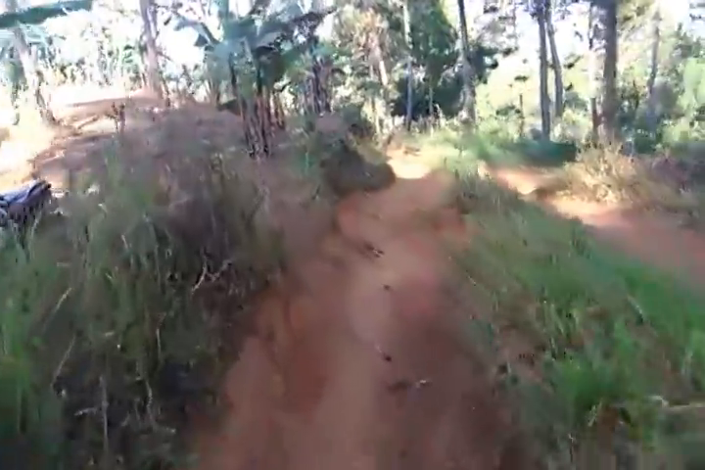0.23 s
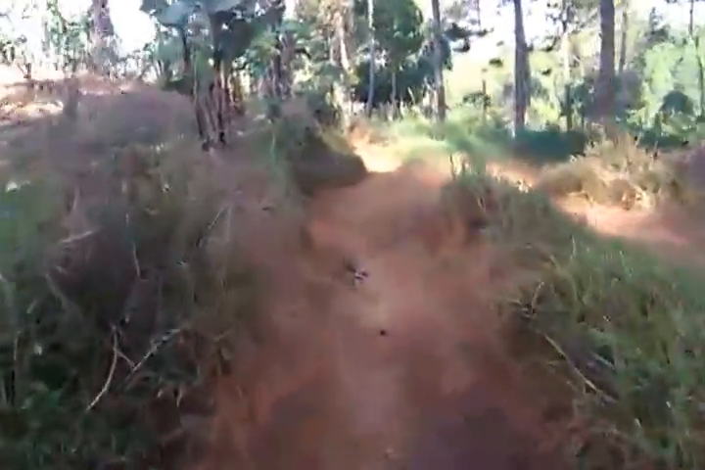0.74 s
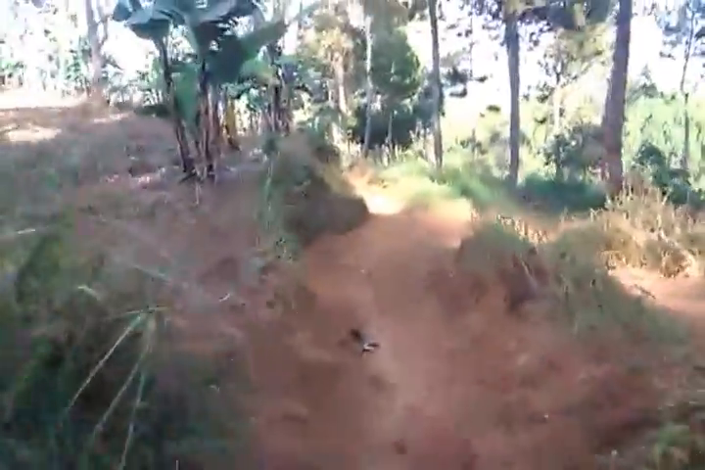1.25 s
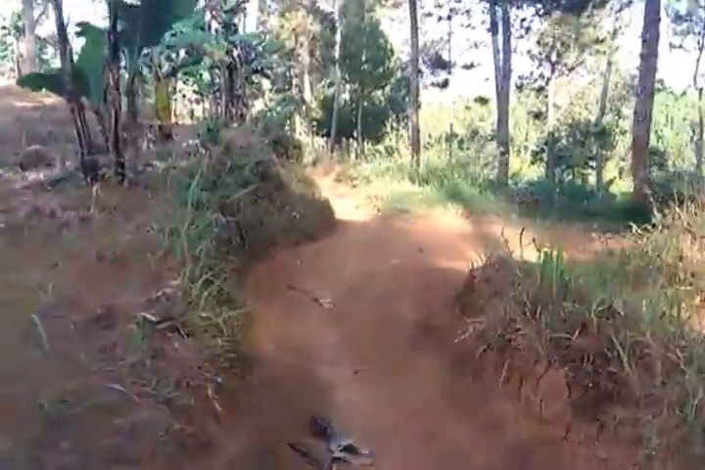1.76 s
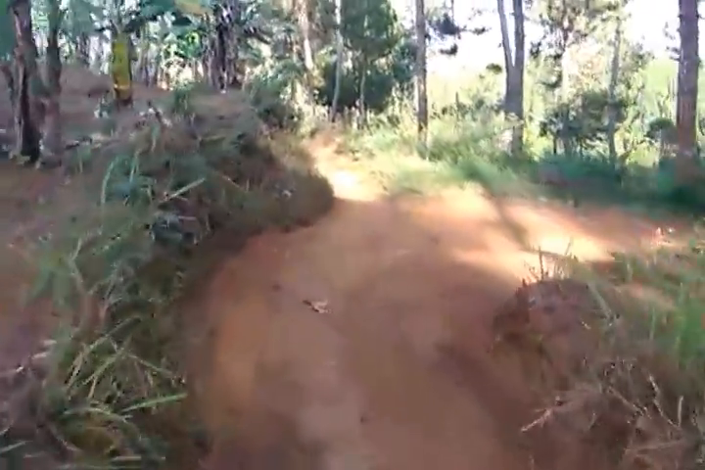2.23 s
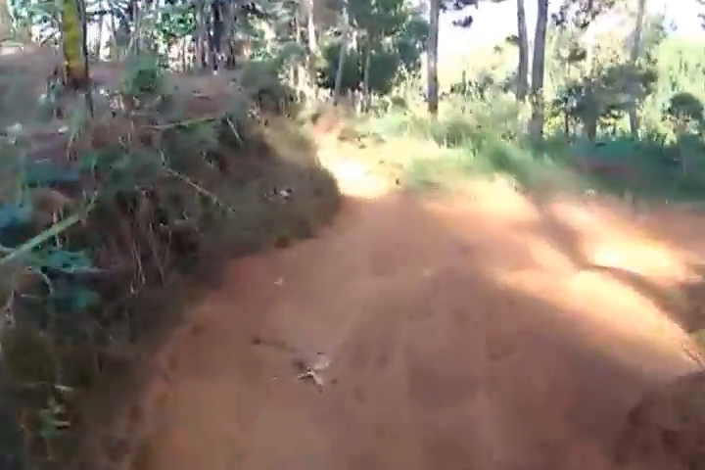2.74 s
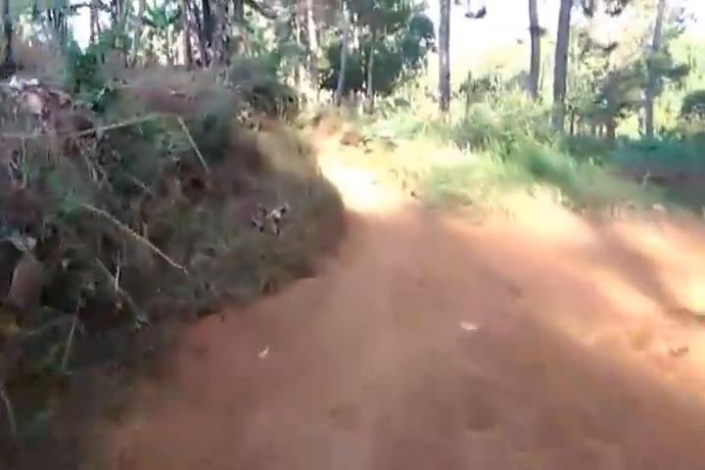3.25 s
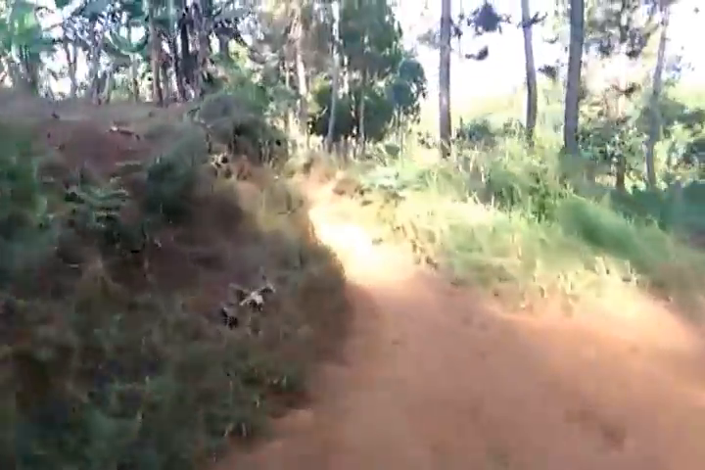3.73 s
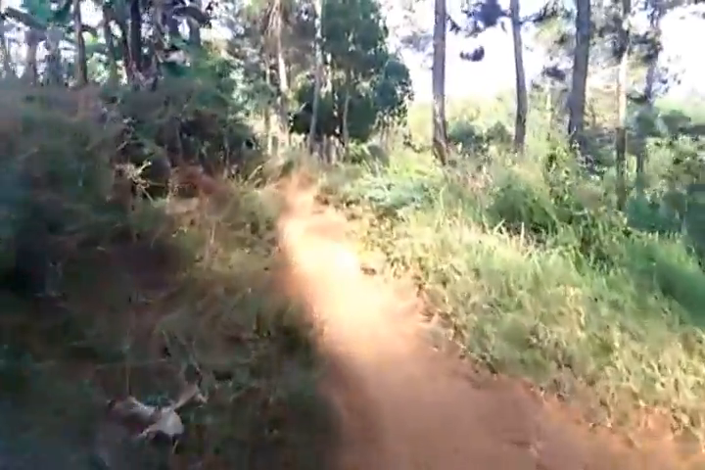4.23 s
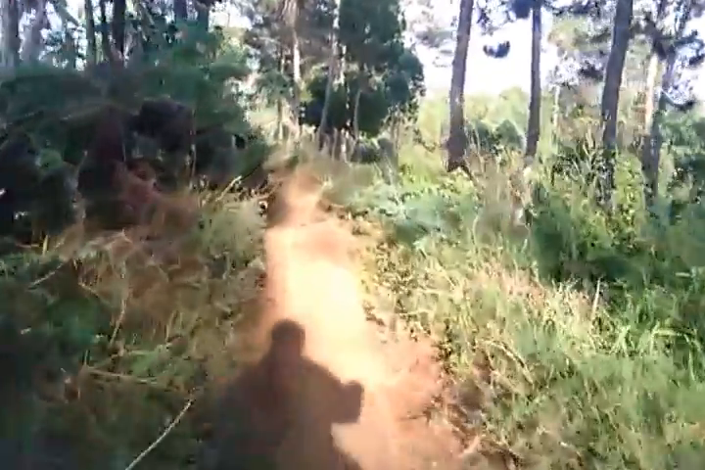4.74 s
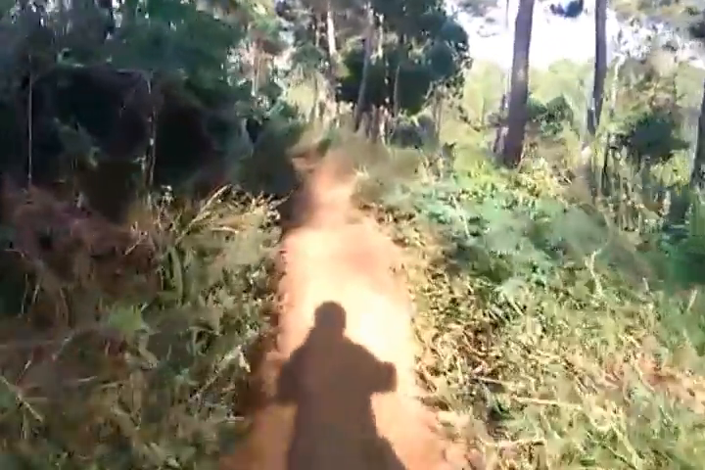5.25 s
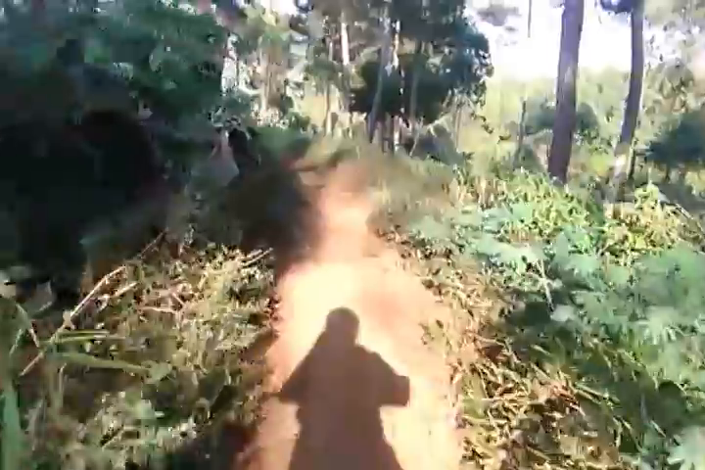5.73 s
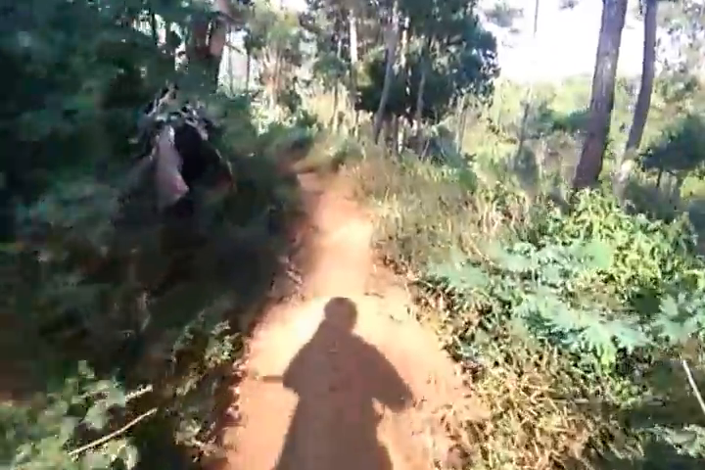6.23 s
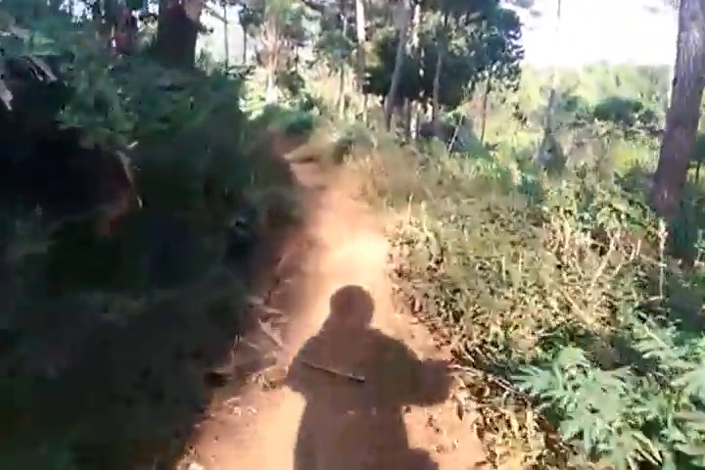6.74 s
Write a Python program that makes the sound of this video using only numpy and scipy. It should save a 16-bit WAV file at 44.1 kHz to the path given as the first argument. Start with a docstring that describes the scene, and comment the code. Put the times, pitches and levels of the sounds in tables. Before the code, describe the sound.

A single-cylinder four-stroke dirt bike putters near idle from the start, heard close from the rider's place in the open air. Each firing gives a low thump and a hollow bark, with valve clatter and faint gear chirps on top. Tyres hiss on the dirt over a low rumble throughout. Dull thuds from bumps cluster around 0.2 and 0.7 seconds, and loose parts give short, scattered rattles, notably near 2 and 2.6 seconds. From about 2.4 seconds the engine picks up, peaking mildly around 3.3 seconds. It then stumbles, with weak firings and a cluster of knocks near 3.8 seconds, and is back at idle by 4 seconds. The putter turns softer from about 4.5 seconds and carries on until about 7 seconds, with a few more thuds and rattles around 4.7, 5.5 and 5.9 seconds.

```python
"""A dirt bike putters down a rough trail, heard from the rider's place. Its single-cylinder
four-stroke engine sucks in air once per firing, thumping the airbox and barking in the intake pipe;
the throttle opens briefly, then the engine stumbles back to idle. Gears chirp and valves clatter in
the casing, tyres hiss on the dirt and loose parts rattle. Dull low thuds come from trail jolts and
uneven engine firings."""
import sys
import numpy as np
from scipy import signal
from scipy.fft import rfft, irfft, next_fast_len
from scipy.io import wavfile
from scipy.ndimage import uniform_filter1d

SR = 44100
rng = np.random.default_rng(int(sys.argv[2]) if len(sys.argv) > 2 else 0)


def output_pcm(signal):
    """Save a mono or channel-first signal as 16-bit PCM at the path in sys.argv[1].

    Samples are clipped to [-1, 1] before scaling.
    """
    pcm = np.clip(np.atleast_2d(signal).T, -1, 1) * 32767
    wavfile.write(sys.argv[1], SR, np.round(pcm).astype(np.int16))


N = 307799
TIME = np.arange(N) / SR

# Dull low thuds, from trail jolts and uneven engine firings.
# Each row: start in seconds, level in dB, pitch in Hz.
LOW_THUDS = [(0.152, -7, 362), (0.2227, -12, 139), (0.2578, -8.5, 223), (0.6513, -9, 184),
             (0.6712, -11, 171), (0.6776, -8, 235), (0.6972, -7, 142), (2.633, -12, 125),
             (3.8117, -10, 170), (3.8236, -4, 380), (3.8555, -9.5, 157), (4.653, -15, 169),
             (4.695, -13, 161), (5.5367, -11.5, 140), (5.9102, -11, 218)]
# The ground under the tyres. Each row: time in seconds, hiss level in dB, rumble level in dB.
GROUND_LEVELS = [(0, -38.5, -29), (1.1, -39.5, -27), (2, -35.5, -30), (2.35, -39.5, -28),
                 (2.7, -35.5, -24.5), (3.35, -34, -24.5), (3.9, -35.5, -24), (4.3, -37.5, -27),
                 (4.9, -40, -28.5), (6.1, -38, -28), (6.98, -38, -29)]


def undb(db):
    """Decibels to gain."""
    return 10 ** (np.asarray(db) / 20)


def unit(x):
    """Scale to rms 1."""
    return x / np.std(x)


def curve(table, column=1):
    """One column of a table, joined by straight lines in time."""
    table = np.array(table)
    return np.interp(TIME, table[:, 0], table[:, column])


def resonance(f, hz, width):
    """Response of a damped resonator at the frequencies f, gain 1 at its centre."""
    return 1j * f * width / (hz ** 2 - f ** 2 + 1j * f * width)


def shape(x, response):
    """Filter a sound with a response given as a function of frequency."""
    size = next_fast_len(len(x) + SR // 10)
    return irfft(rfft(x, size) * response(np.fft.rfftfreq(size, 1 / SR)), size)[:len(x)]


def colour(x, points):
    """Equalise a sound along (Hz, dB) points, at rms 1."""
    hz, db = np.transpose(points)
    return unit(shape(x, lambda f: undb(np.interp(np.log(f + 1), np.log(hz), db))))


def walk(rate):
    """Smooth random wander with a spread near 1, taking `rate` steps a second."""
    hold = int(SR / rate)
    steps = np.repeat(rng.standard_normal(N // hold + 1), hold)
    return unit(uniform_filter1d(steps, hold))[:N]


def grains(rate, spread_db):
    """Random tiny impacts of uneven size, about `rate` a second."""
    hit = rng.random(N) < rate / SR
    return unit(hit * rng.standard_normal(N) * undb(spread_db * rng.standard_normal(N)))


def add(out, sound, start_s):
    """Mix a sound in from the given time on."""
    i = int(round(start_s * SR))
    part = sound[max(-i, 0):max(N - i, 0)]
    out[max(i, 0):max(i, 0) + len(part)] += part


def ground_rumble(flutter_db=2.42, jolt_db=4, jolt_s=0.025):
    """The rough ground shakes the bike; the rumble swells around each thud."""
    # The rumble's tone. Each row: frequency in Hz, relative level in dB.
    rumble_eq = [(10, -2.5), (30, 0.5), (80, 3.5), (150, -1.5), (220, -5.5), (340, -5), (480, -13),
                 (650, -21.5), (1200, -51.5)]
    jolt = np.max([np.exp(-((TIME - s) / jolt_s) ** 2) for s, _, _ in LOW_THUDS], axis=0)
    bed = colour(rng.standard_normal(N), rumble_eq)
    return bed * undb(curve(GROUND_LEVELS, column=2) + jolt_db * jolt + flutter_db * walk(rate=25))


def grit_hiss(valves, valve_depth=0.26, flicker_db=1.11):
    """Fine grit under the tyres and engine hiss, one texture that pulses with the valves."""
    # The hiss's tone. Each row: frequency in Hz, relative level in dB.
    hiss_eq = [(300, -5.5), (600, 6), (1200, 5), (2200, -2), (3100, 1), (3600, -4), (4300, -1.5), (5000, 1),
               (6000, 0.5), (6600, -3), (7200, -4.5), (7800, -16)]
    grit = colour(grains(rate=9000, spread_db=0) * (1 + valve_depth * valves), hiss_eq)
    return grit * undb(curve(GROUND_LEVELS) + flicker_db * walk(rate=45))


def rattles(attack_s=.0012):
    """Loose parts and stones give short bursts of ringing noise, and a sharp broad click sounds at 3.025 s."""
    # Each row: start in seconds, level in dB, centre in Hz, width in Hz, decay in seconds.
    rattle_hits = [(.153, -20, 485, 200, 0.0049), (.443, -36.5, 2580, 500, .014),
                   (.668, -26, 406, 200, 0.039), (1.511, -22, 558, 400, 0.0071),
                   (1.877, -27, 5200, 3060, 0.0046), (2.018, -20, 4020, 2400, 0.003),
                   (2.542, -26.5, 5370, 1200, 0.0097), (2.556, -22, 690, 453, 0.021),
                   (2.558, -23, 1910, 993, 0.014), (2.703, -26.5, 740, 400, 0.02),
                   (3.025, -25, 4000, 4000, 0.0029), (3.823, -25.5, 706, 497, 0.017),
                   (3.826, -26, 1930, 300, 0.026), (3.910, -33, 5380, 3000, 0.029),
                   (4.057, -23.5, 1600, 1200, 0.01), (4.695, -25, 1944, 119, 0.016),
                   (4.974, -31, 1890, 200, 0.019), (5.770, -24.5, 705, 248, 0.011),
                   (6.574, -32.5, 5630, 2500, 0.018), (6.598, -28.5, 1120, 288, 0.012)]
    out, t = np.zeros(N), TIME[:SR // 6]
    for start, db, hz, width, decay in rattle_hits:
        burst = unit(shape(rng.standard_normal(len(t)), lambda f: resonance(f, hz, width) ** 2))
        envelope = np.exp(-t / decay) * (1 - np.exp(-t / attack_s))
        add(out, undb(db) * burst * envelope, start)
    return out


def low_thuds(rise_cycles=0.49, boost_db=1, soft_hz=620):
    """Trail jolts and uneven engine firings give dull low thuds that die within a few swings."""
    out, t = np.zeros(N), TIME[:SR // 6]
    for start, db, hz in LOW_THUDS:
        age = t * hz / rise_cycles
        envelope = age * np.exp(1 - age)
        add(out, undb(db + boost_db) * envelope * np.sin(2 * np.pi * hz * t), start)
    return shape(out, lambda f: np.exp(-(f / soft_hz) ** 2))


def engine_cycle():
    """Number of engine cycles turned so far; each firing completes one."""
    # Idle, a brief swell, a stumble back. Each row: time in seconds, firings per second.
    firing_rate = [(0, 12.48), (.38, 12.77), (.69, 12.04), (1.02, 12.02), (1.29, 11.26), (1.89, 11.79),
                   (2.43, 13.13), (2.54, 14.33), (2.7, 14.1), (3.32, 16.96), (3.84, 12.73), (3.86, 11.47),
                   (4.56, 11.76), (4.76, 12.51), (4.9, 12.05), (5.6, 12.76), (5.62, 12.09), (6.98, 11.67)]
    return np.cumsum(curve(firing_rate)) / SR


def valve_pulses(cycle, seats=(0.33, .9), spread=0.11):
    """A smooth pulse as each of two valves closes; seats and spread are shares of the engine cycle."""
    offsets = [(cycle - seat + .5) % 1 - .5 for seat in seats]
    return sum(np.exp(-(offset / spread) ** 2) for offset in offsets)


def gear_whine(cycle, backlash=0.012, flicker_db=3.0):
    """Gears and cam chain whine in short chirps that follow the uneven crank and its load."""
    # The crank slows under compression and kicks on at ignition.
    # Each row: share of the cycle, relative speed, gear load in dB, cam load in dB.
    crank_motion = [(0, 1, -5, -18), (.1, 1.04, 3.5, -12.5), (.22, 1, -4, -1.5), (.3, 1.04, -9, 1),
                    (.38, 1.01, -0.5, -2), (.48, .97, 0.5, -3.5), (.6, .94, -7.5, -1.5),
                    (.68, .8, 3.5, -13.5), (.76, .99, 2, -16), (.84, 1.02, -1, -18.5),
                    (0.939, .98, -7.5, -15.5)]
    # Meshing gears, then the cam chain. Each row: teeth per engine cycle, relative level in dB.
    gear_mesh = [(101, 0.5), (162, -0.5)]
    cam_mesh = [(72.46, 0.23), (52.2, -1.5)]
    share, *columns = np.transpose(crank_motion)
    speed, gear_db, cam_db = (np.interp(cycle, share, c, period=1) for c in columns)
    turn_per_sample = np.gradient(cycle) * speed
    out = np.zeros(N)
    for mesh, load_db in ((gear_mesh, gear_db), (cam_mesh, cam_db)):
        for teeth, db in mesh:
            phase = np.cumsum(teeth * turn_per_sample * (1 + backlash * walk(rate=120)))
            out += undb(db + load_db + flicker_db * walk(rate=35)) * np.sin(2 * np.pi * phase)
    return unit(out)


def casing_ring(drive, modes):
    """The casing rings in damped modes of alternating polarity, at rms 1."""
    def response(f):
        return sum((-1) ** k * undb(db) * resonance(f, hz, width)
                   for k, (hz, width, db) in enumerate(modes))
    return unit(shape(drive, response))


def casing_clatter(cycle, valves, valve_depth=.5, whine_db=-12, flutter_db=1.0, split_hz=1620):
    """Meshing teeth and a spray of tiny impacts, harder as the valves close, ring the casing."""
    # The casing's modes. Each row: pitch in Hz, width in Hz, relative level in dB.
    casing_modes = [(663, 54, -8.5), (822, 32.3, 1.5), (912, 74, -1.5), (1108, 73, 0.5), (1158, 78, -0.5),
                    (1233, 56, -.5), (1384, 26, -3), (1532, 110, -8), (1744, 31, -4.5), (1891, 41, -5),
                    (1975, 55, -7), (2098, 110, -8), (2590, 130, -13), (2756, 43, -14.5), (2835, 17, -7.5),
                    (3820, 35, -14.5)]
    # The ring's loudness. Each row: time in seconds, low modes in dB, high modes in dB.
    ring_levels = [(0, -38, -46), (.45, -35.5, -42.5), (.75, -37.5, -45.5), (1.4, -36.5, -40),
                   (2, -35.5, -41.5), (2.65, -35, -43.5), (3.1, -35, -39), (3.9, -34.5, -38.5),
                   (4.6, -35.5, -38), (4.85, -35.5, -42.5), (6.4, -35.5, -41), (6.98, -37.5, -41)]
    whine = undb(whine_db + flutter_db * walk(rate=6)) * gear_whine(cycle)
    impacts = grains(rate=2500, spread_db=0.5) * (1 + valve_depth * valves)
    drive = impacts + whine
    low = casing_ring(drive, [mode for mode in casing_modes if mode[0] < split_hz])
    high = casing_ring(drive, [mode for mode in casing_modes if mode[0] >= split_hz])
    return low * undb(curve(ring_levels)) + high * undb(curve(ring_levels, column=2))


def firings(cycle, throttle_scatter=.05, thump_scatter_db=0.4, bark_scatter_db=0.5):
    """Time, throttle, thump dB and bark dB of each firing: strength follows effort; a few misfire."""
    # How hard the engine works. Each row: time in seconds, throttle 0-1, thump in dB, bark in dB.
    effort = [(0, 0.03, -4, 0), (.9, 0.37, -1.5, -2.5), (1.85, 0.46, -1, -1.5), (2.1, 0.78, -1.2, -3.2),
              (2.45, 0.2, -1.5, 1.5), (2.72, 0.7, -3, 0.5), (3, 0.83, 0.8, 1.5), (3.55, 0.76, -1.2, 1.5),
              (3.9, 0.68, -2.5, -1.5), (4.33, 0.17, -5.5, -0.5), (4.85, 0, -11, .7), (5.4, 0.06, -7.5, 0.7),
              (6.45, 0, -6.5, .5), (6.98, 0.35, -4, -1.2)]
    # Firings that burn poorly. Each row: time in seconds, thump change in dB, bark change in dB.
    misfires = [(3.45, -3, -10.5), (3.65, -3, -5.5), (3.73, -3, -4.5), (3.79, -5, -7), (3.97, -5.5, -8),
                (4.14, -3.5, -7.5)]
    times = np.interp(np.arange(int(cycle[-1]) + 1), cycle, TIME)
    knots, *columns = np.transpose(effort)
    throttle, thump_db, bark_db = (np.interp(times, knots, c) for c in columns)
    for when, thump_dip_db, bark_dip_db in misfires:
        nearest = np.argmin(abs(times - when))
        thump_db[nearest] += thump_dip_db
        bark_db[nearest] += bark_dip_db
    scatter = rng.standard_normal((len(times), 3))
    throttle = np.clip(throttle + throttle_scatter * scatter[:, 0], 0, 1)
    thump_db += thump_scatter_db * scatter[:, 1]
    bark_db += bark_scatter_db * scatter[:, 2]
    return zip(times, throttle, thump_db, bark_db)


def cavity(f, modes, throttle):
    """Air resonances slide from their shut-throttle to their open-throttle tuning, mostly upward."""
    total = 0
    for mode in np.array(modes):
        shut, wide_open, polarity = mode[:3], mode[3:6], mode[6]
        hz, width, db = shut + throttle * (wide_open - shut)
        total = total + polarity * undb(db) * resonance(f, hz, width)
    return total


def firing_thumps(cycle, pulse_hz=217, pulse_db=-46, sharpening=0.14, lead_s=.006, size=8192):
    """Each firing's low thump and pipe bark: a suction pulse, sharper with throttle, rings the intake."""
    # The airbox's thump and the intake pipe's bark. Each row: pitch in Hz, width in Hz and gain in dB
    # with the throttle shut, the same three with it open, then polarity.
    thump_modes = [(73.98, 31.2, 15.5, 82, 23, 12.5, 1), (76.28, 43.8, 13, 88.9, 30.7, 12, -1)]
    bark_modes = [(302.4, 83, 5.5, 301, 33.2, 10.4, -1), (349.6, 27.3, 9, 364, 38, 13, 1),
                  (383, 23, -4.5, 440, 48, 2.5, -1)]
    out, f = np.zeros(N), np.fft.rfftfreq(size, 1 / SR)
    delay = np.exp(-2j * np.pi * f * lead_s)  # leaves room for the pulse to swell
    for when, throttle, thump_db, bark_db in firings(cycle):
        reach_hz = pulse_hz * (1 + sharpening * throttle)
        pulse = SR * undb(pulse_db) * np.exp(-(f / reach_hz) ** 2) * delay
        thump = undb(thump_db) * cavity(f, thump_modes, throttle)
        bark = undb(bark_db) * cavity(f, bark_modes, throttle)
        add(out, irfft(pulse * (thump + bark)), when - lead_s)
    return out


def scene():
    """Engine, ground, thuds and rattles, all close by in the open air, in mono."""
    cycle = engine_cycle()
    valves = valve_pulses(cycle)
    engine = firing_thumps(cycle) + casing_clatter(cycle, valves)
    background = grit_hiss(valves) + ground_rumble()
    return (engine + background + low_thuds() + rattles())[None]


def record(dry):
    """The rider's camera flattens the tallest peaks, rolls the treble off and cuts the very top."""
    roll_off_hz, top_hz = 6800, 7750
    roll_off = signal.butter(12, roll_off_hz, fs=SR, output="sos")
    top_cut = signal.ellip(10, .1, 80, top_hz, fs=SR, output="sos")
    dull = signal.sosfilt(roll_off, np.clip(dry, -.98, .98))
    return signal.sosfilt(top_cut, dull)


dry = scene()
out = record(dry)
output_pcm(out)
```